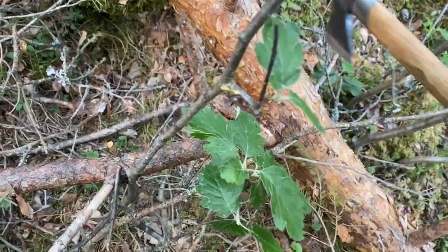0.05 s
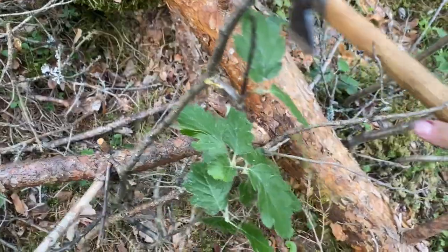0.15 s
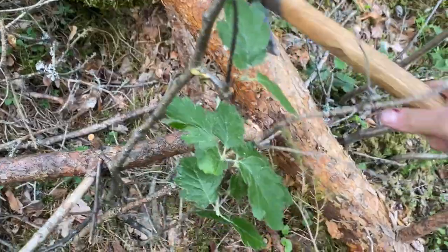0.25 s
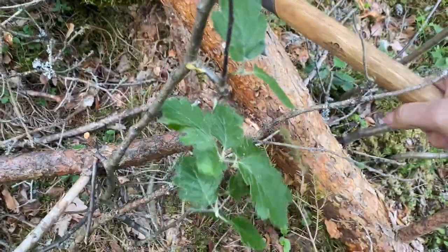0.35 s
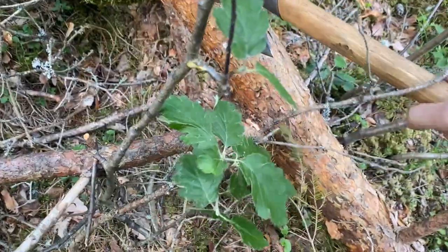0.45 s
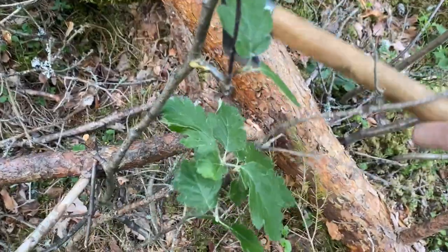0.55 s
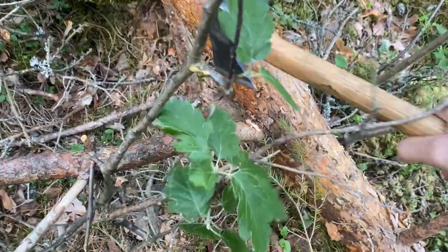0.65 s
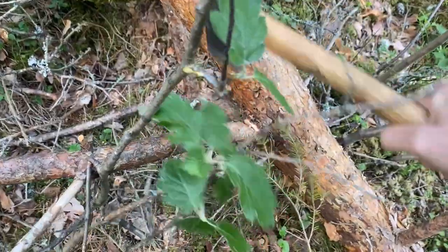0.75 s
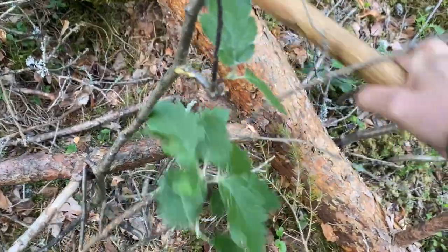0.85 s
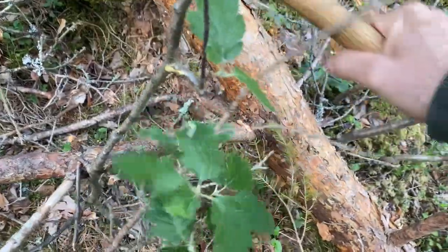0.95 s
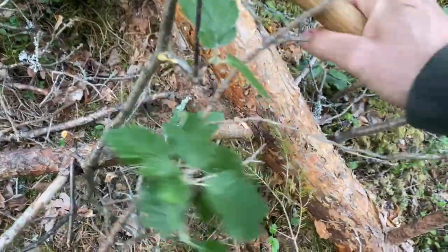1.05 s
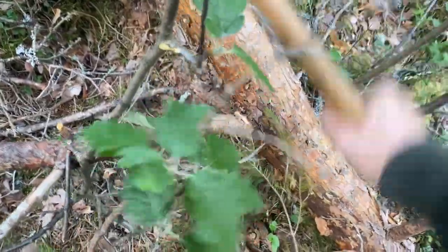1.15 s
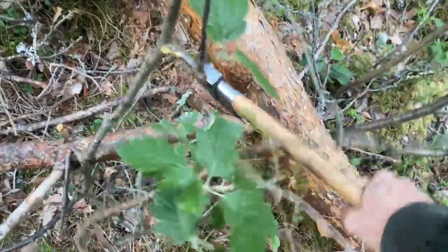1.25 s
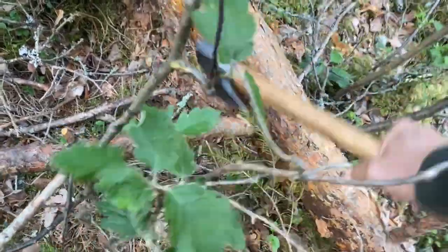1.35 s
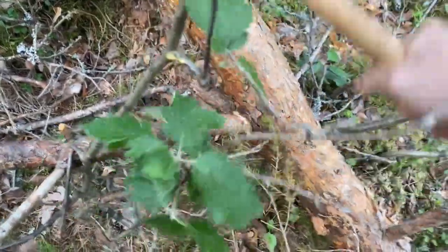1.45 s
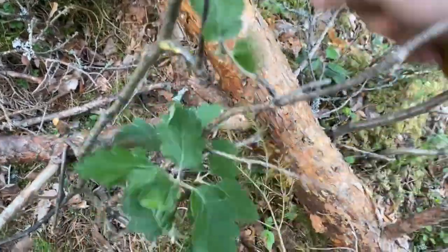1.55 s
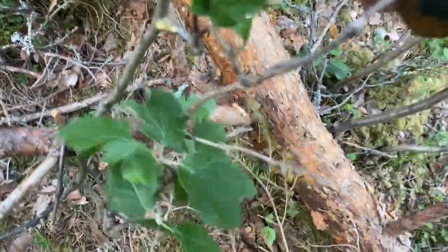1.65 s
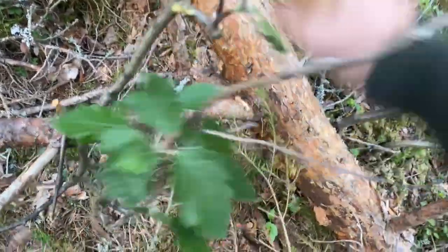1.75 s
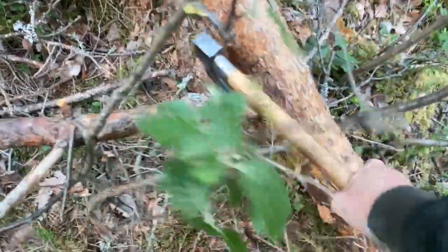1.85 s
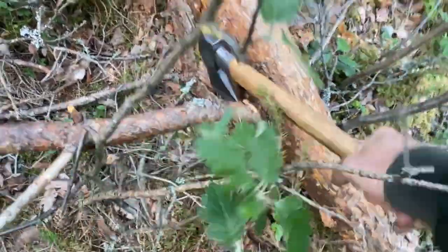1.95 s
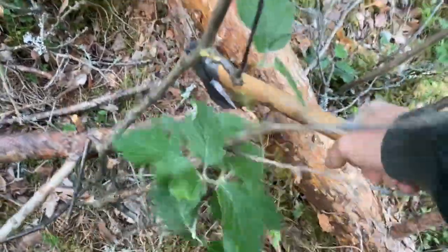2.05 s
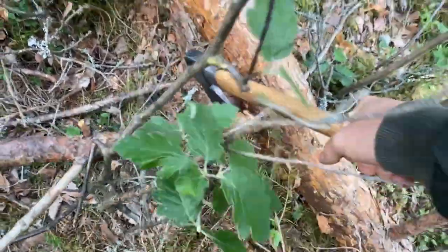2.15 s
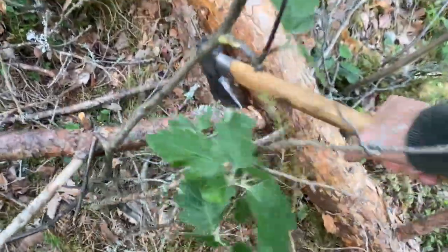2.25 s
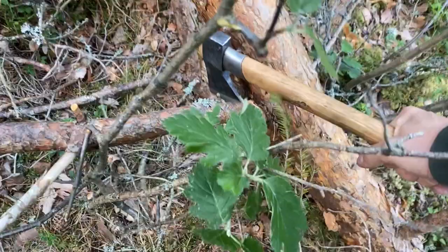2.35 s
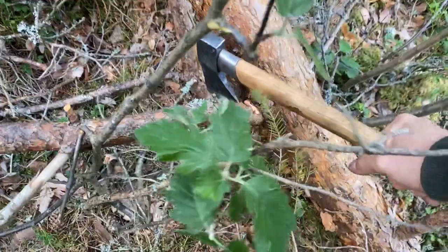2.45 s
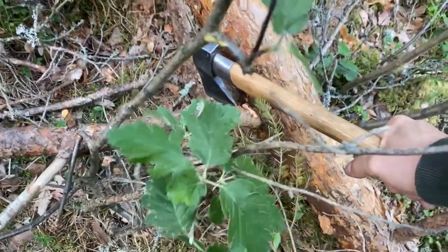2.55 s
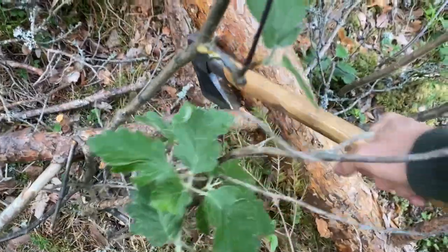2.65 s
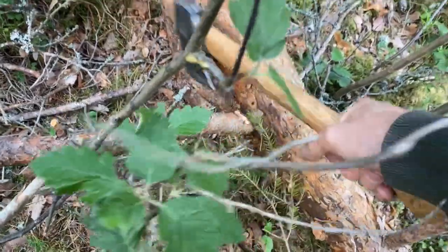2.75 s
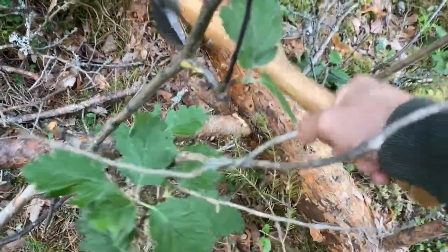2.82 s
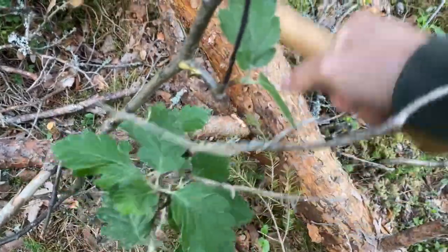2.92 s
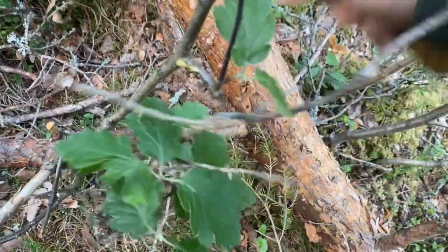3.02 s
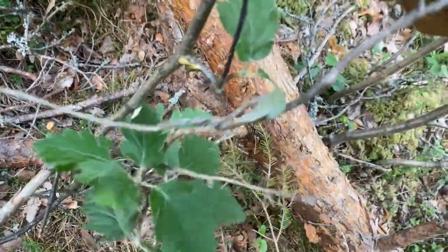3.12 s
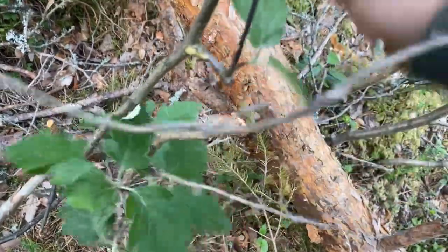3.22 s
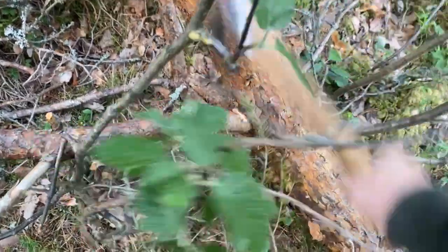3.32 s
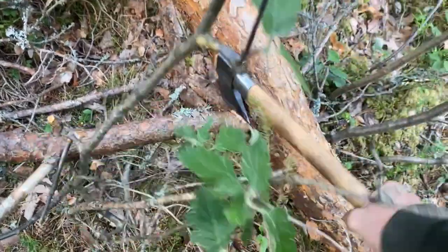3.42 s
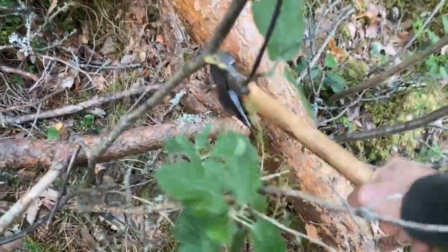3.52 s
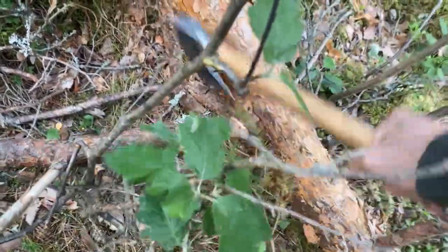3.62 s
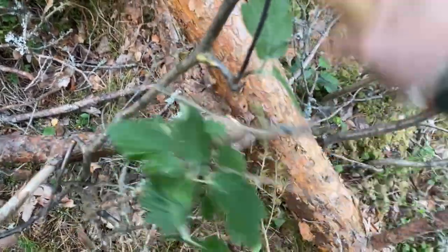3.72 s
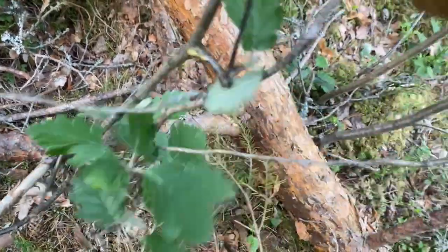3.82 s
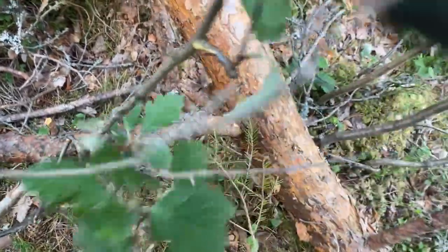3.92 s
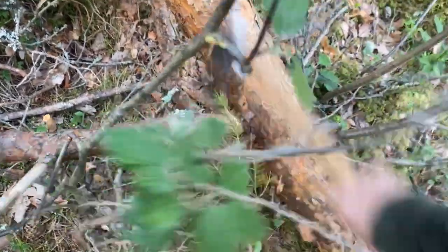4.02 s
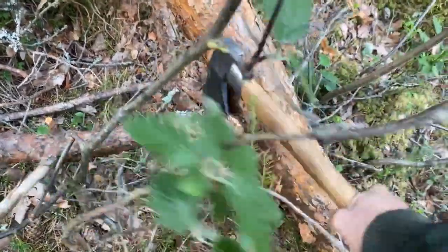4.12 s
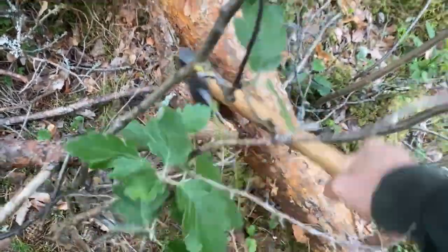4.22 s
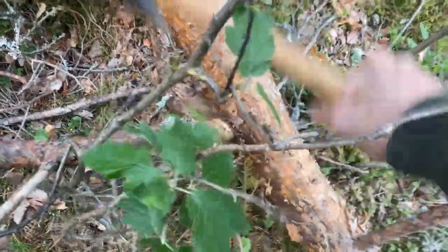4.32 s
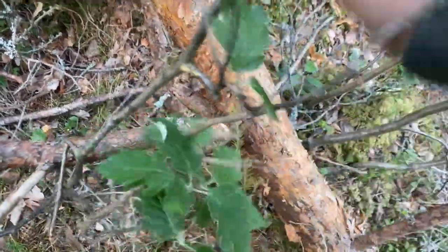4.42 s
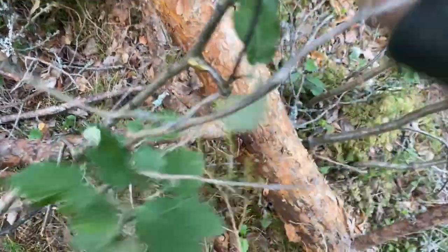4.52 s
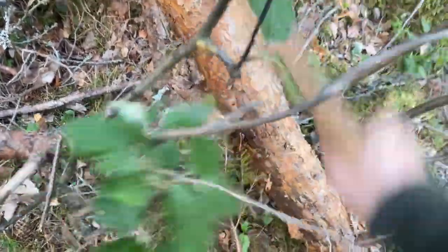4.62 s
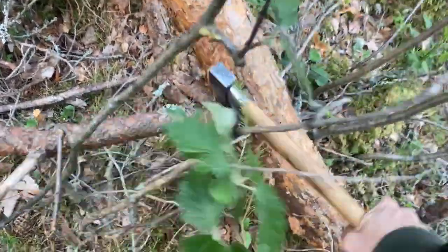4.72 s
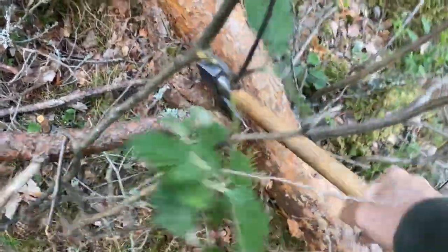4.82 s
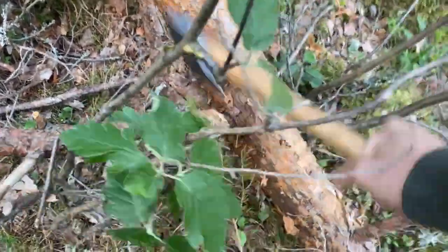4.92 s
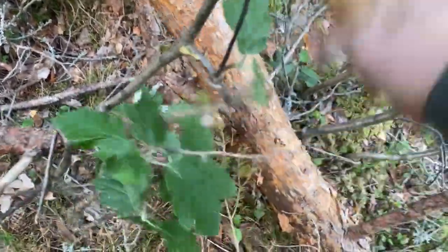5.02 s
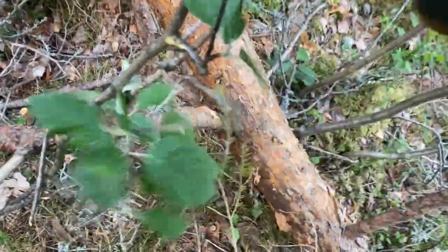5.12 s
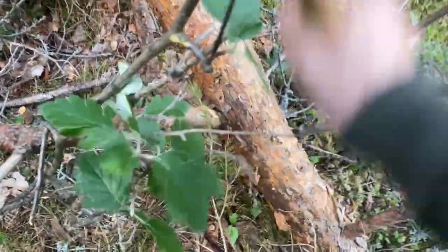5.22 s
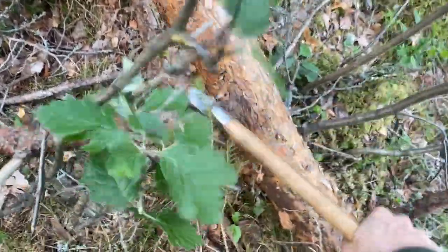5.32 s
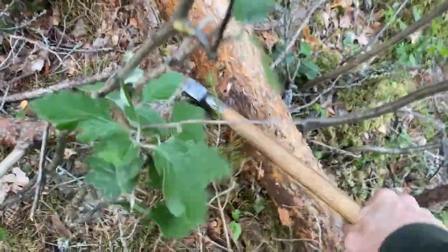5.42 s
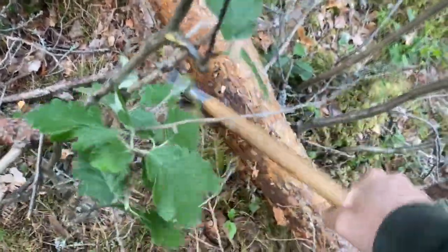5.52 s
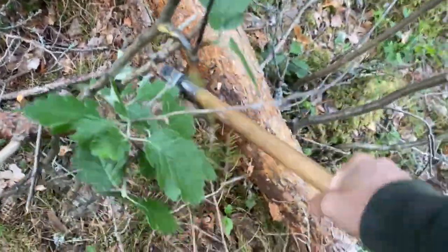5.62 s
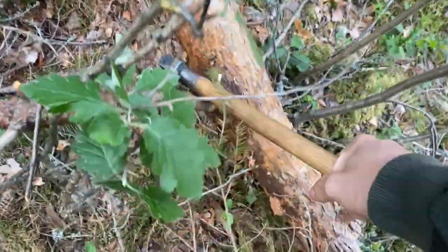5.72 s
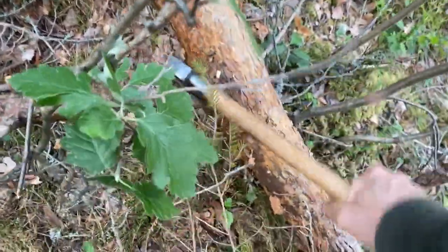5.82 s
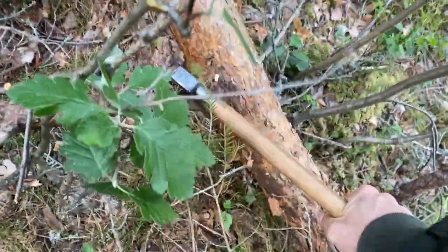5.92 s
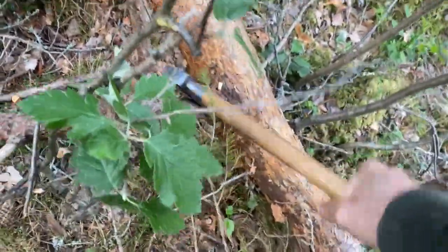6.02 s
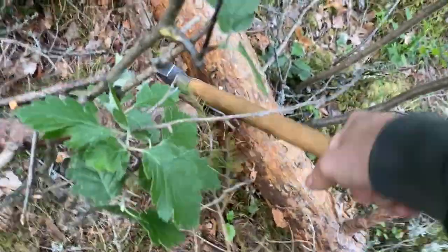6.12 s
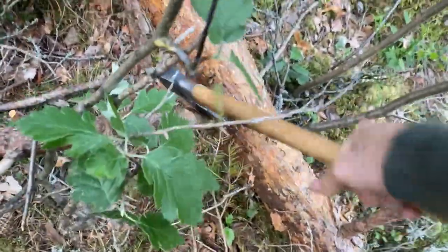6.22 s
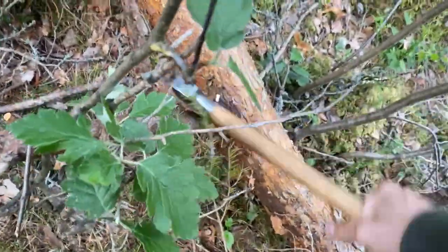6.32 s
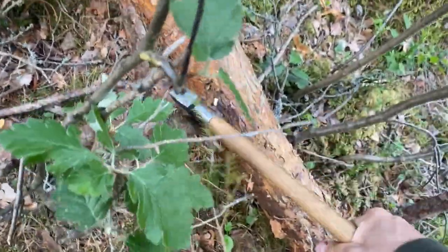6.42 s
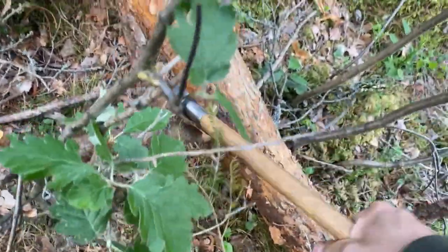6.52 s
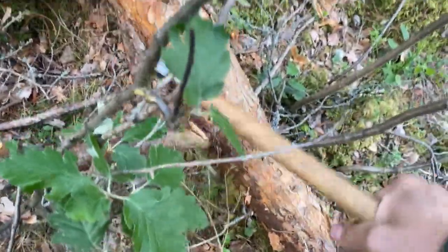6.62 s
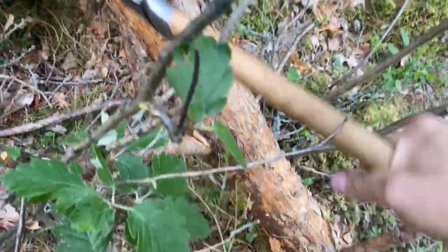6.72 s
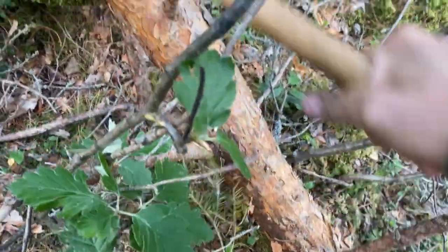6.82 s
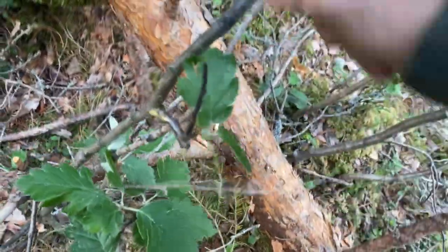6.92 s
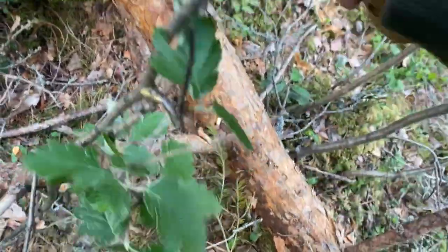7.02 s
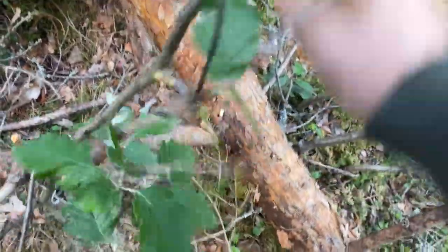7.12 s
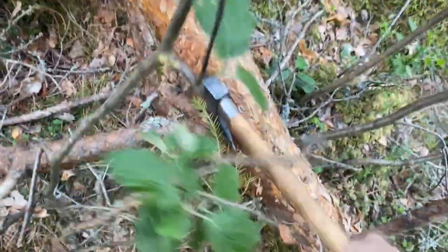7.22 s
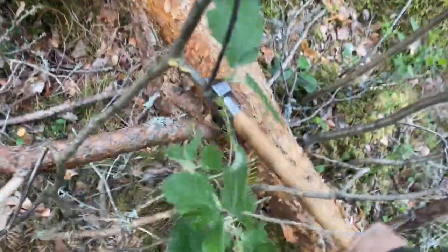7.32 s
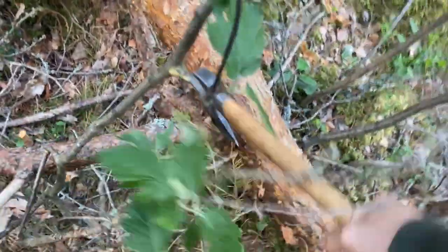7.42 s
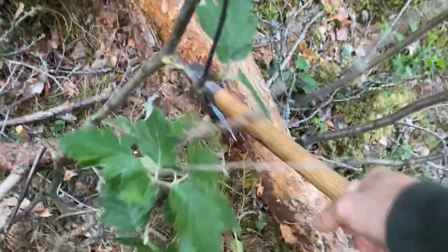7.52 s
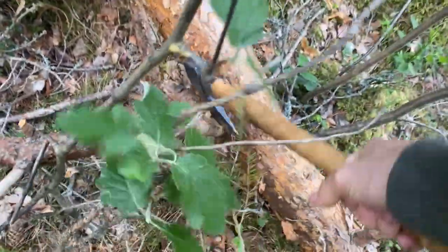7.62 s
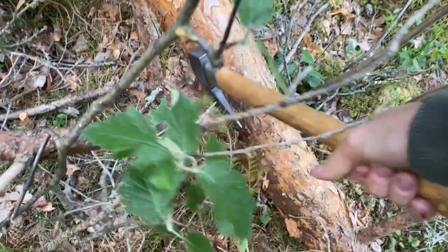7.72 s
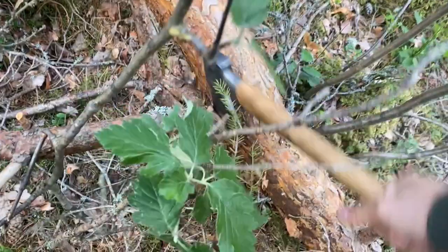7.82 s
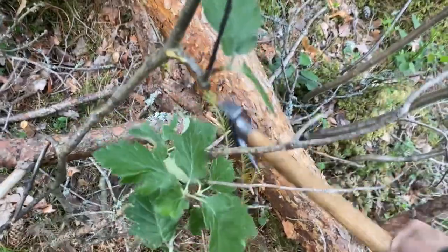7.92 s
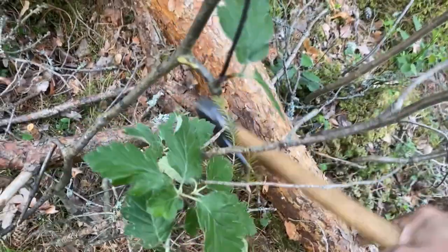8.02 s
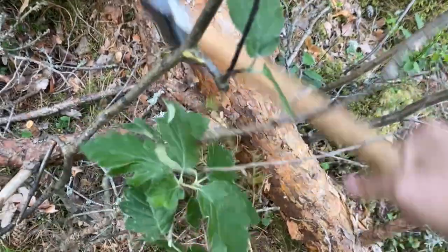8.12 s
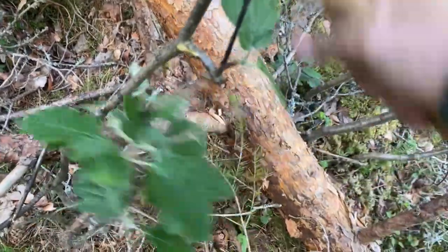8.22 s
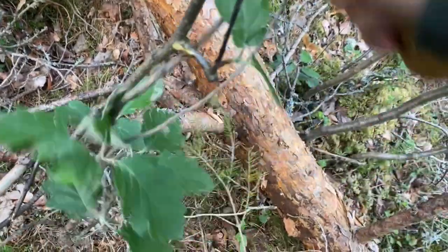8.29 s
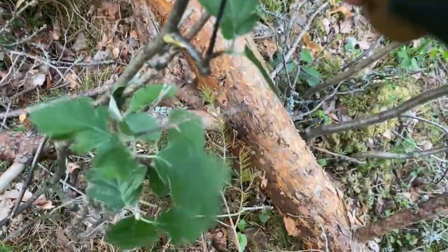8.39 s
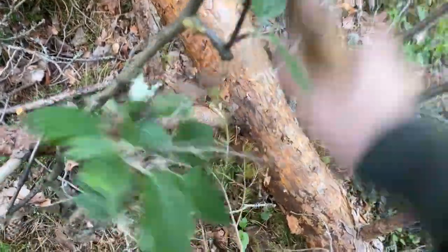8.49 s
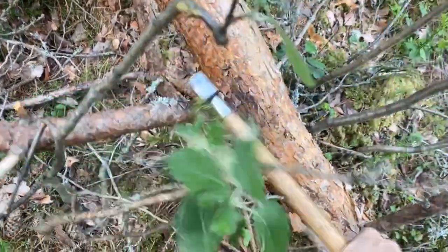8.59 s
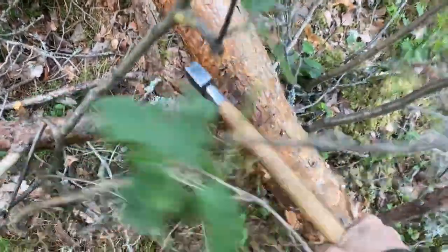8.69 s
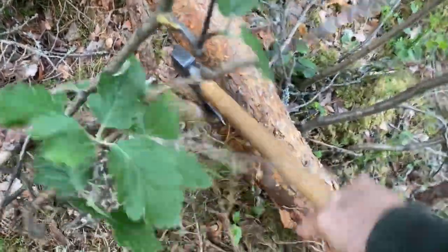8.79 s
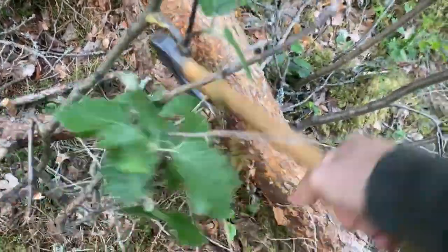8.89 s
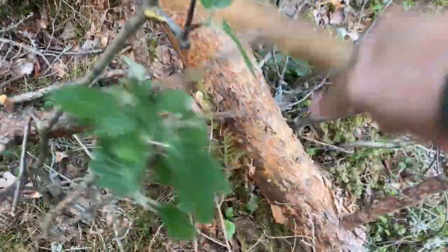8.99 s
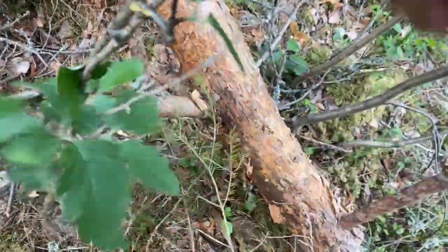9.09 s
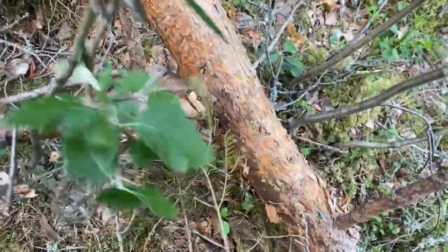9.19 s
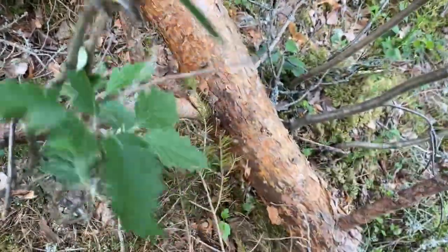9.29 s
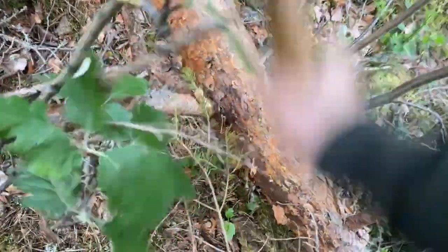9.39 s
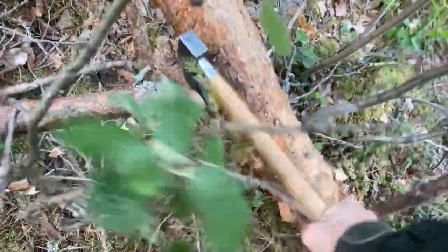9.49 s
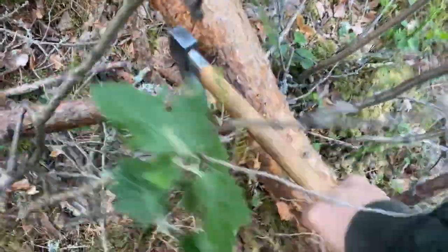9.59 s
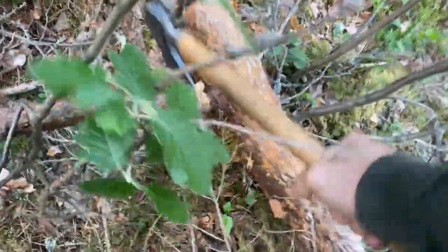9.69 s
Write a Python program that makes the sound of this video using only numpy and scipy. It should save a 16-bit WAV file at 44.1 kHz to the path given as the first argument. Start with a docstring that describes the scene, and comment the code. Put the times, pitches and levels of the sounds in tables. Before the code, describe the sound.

A small axe chops a fallen log in nine sharp, dry, woody blows, with leaves rustling and twigs snapping between them in a quiet forest.

```python
"""Axe chopping a pine log

A small axe chops into a fallen log in a forest, an arm's length away. Each blow is a blade force driving
the log's resonances, with a bright burst of breaking fibres; nearby trunks scatter the crack back.
Between blows twigs snap as runs of tiny fractures, leaves and sleeve rustle as moving noise,
and footing bumps as short low pulses, over the faint wash and low rumble of the air.
"""
import sys
import numpy as np
from scipy import signal
from scipy.fft import rfft, irfft
from scipy.io import wavfile
from scipy.ndimage import uniform_filter1d

SR = 44100
rng = np.random.default_rng(int(sys.argv[2]) if len(sys.argv) > 2 else 0)


def generate_wav(sig):
    """Save sig (samples, or channels by samples) to the path in sys.argv[1] as 16-bit PCM at SR."""
    pcm = np.round(np.clip(np.atleast_2d(sig).T, -1, 1) * 32767).astype(np.int16)
    wavfile.write(sys.argv[1], SR, pcm)


N = 429975

# Still forest air: (frequency [Hz], level [dB])
AIR_COLOUR = [(40, -1.5), (150, 5.5), (350, 4.5), (700, 4), (1200, -3.5), (2000, -9), (3200, -6.5),
              (6000, -24), (16000, -38.5)]
# Level of the low rumble of air and handling: (time [s], level [dB])
RUMBLE_LEVEL = [(0, -58), (.45, -57.5), (1, -64.5), (1.3, -53.5), (1.55, -76.5), (1.8, -57.5), (2.15, -65),
                (2.3, -53), (2.62, -73), (2.85, -52), (3.4, -50), (3.7, -58), (4.5, -53), (5.8, -52.5),
                (6.35, -62), (6.6, -59), (6.9, -58.5), (7.32, -51), (7.7, -65), (8.22, -50.5), (9.2, -60),
                (9.4, -41), (9.75, -58.5)]
# Tone of that rumble: (frequency [Hz], level [dB])
RUMBLE_TONE = [(15, -19), (35, -7.5), (62, 2), (85, -7.5), (130, -15.5), (250, -25), (800, -57)]
# Decay of the far forest tail: (frequency [Hz], t60 [s])
FOREST_DECAY = [(60, .5), (200, 0.52), (600, 0.26), (1100, 0.7), (2500, 0.49), (6000, 0.43), (14000, 0.19)]
# Tone of the far forest tail: (frequency [Hz], level [dB])
FOREST_TONE = [(60, 0), (200, -10), (600, -10.5), (900, -7.5), (1090, -6.5), (1350, -10.5), (1690, -5.5),
               (2000, -8.5), (3000, -11.5), (7000, -4), (14000, -1)]
# Loudest soft bumps of footing and handling: (time [s], frequency [Hz], envelope peak [dB])
SOFT_BUMPS = [(.3, 70, -43.5), (.385, 96, -49), (.485, 102, -42), (1.244, 150, -37), (1.285, 173, -30.5),
              (1.311, 137, -31), (1.327, 102, -35), (2.316, 104.7, -43), (2.494, 102.3, -46.5),
              (2.82, 79.7, -43), (2.929, 84, -44.5), (3.045, 80, -41.5), (3.23, 76, -45),
              (3.464, 86.5, -42), (3.54, 73.7, -42.5), (4.325, 82, -39.5), (4.87, 66, -36),
              (4.971, 65.6, -38.5), (5.701, 110, -30), (5.745, 111, -39.5), (5.846, 105, -42),
              (5.96, 82, -37), (6.128, 74.3, -46.5), (7.096, 88.4, -40), (7.335, 70.7, -42),
              (7.4, 66.4, -44), (7.868, 71, -40), (7.92, 110.9, -40), (7.97, 74.8, -45), (8.2, 59.4, -36.5),
              (8.47, 125, -37), (8.715, 70.3, -41), (8.93, 78.7, -42.5), (9.335, 87, -36),
              (9.366, 105, -29), (9.393, 74, -27)]
# Dull shuffling as weight and grip shift: (middle [s], length [s], level [dB])
SHUFFLE_SPELLS = [(0.439, 0.26, -57), (1.289, 0.13, -43.5), (1.448, .06, -53), (1.735, .05, -48),
                  (1.917, 0.13, -51.5), (2.358, 0.13, -60), (5.756, 0.092, -51), (7.933, .13, -55.5)]
# Tone of the shuffling: (frequency [Hz], level [dB])
SHUFFLE_TONE = [(30, -21), (70, 0.5), (105, 0.5), (200, -9), (330, -20), (800, -43)]
# The arm lifts or aims the axe and brushes leaves: (middle [s], length [s], level [dB], swish centre [Hz])
ARM_SWEEPS = [(0.091, 0.28, -62.5, 3145), (0.44, .24, -53.5, 3970), (0.805, 0.47, -57.5, 3160),
              (1.102, .15, -50.5, 3090), (1.333, .12, -50, 3087), (1.464, .058, -43, 5295),
              (1.591, .25, -49.5, 4080), (3.121, 0.41, -56.5, 4940), (3.823, 0.37, -51.5, 3234),
              (4.44, 0.18, -47, 3560), (4.56, 0.091, -59, 5220), (5.069, 0.14, -50, 5813),
              (5.24, 0.057, -53.5, 3040), (5.894, 0.43, -65.5, 4420), (6.331, 0.0524, -69, 3410),
              (7.091, 0.2, -53.5, 2850), (8.497, 0.36, -52.5, 2755), (9.102, 0.28, -50.5, 5040),
              (9.293, 0.3, -49, 5150), (9.727, 0.24, -53.5, 4200)]
# Tone of rubbing sleeve and leaves: (frequency [Hz], level [dB])
RUSTLE_TONE = [(100, 2), (250, 6.5), (600, 2), (1100, 3), (2000, -2.5), (3000, -2), (6000, 2.5),
               (11000, -6.5), (14000, -2), (16000, -13.5)]
# Pitch range of buckling leaves: (lowest [Hz], highest [Hz])
CRINKLE_RANGE = (1800, 7000)
# Loudest twigs and chips: (time [s], t60 [s], body [dB], crack [dB], snap [dB])
TWIG_SNAPS = [(.291, 0.024, -50, -45, -29), (0.2965, 0.028, -56, -46, -37.5),
              (0.3281, 0.019, -64, -51, -37.5), (0.6686, .02, -69.5, -63, -48.5),
              (0.8281, 0.022, -42.5, -32, -26.5), (1.318, .02, -53.5, -56, -64),
              (1.42, 0.025, -33.5, -29.5, -31.5), (1.443, .03, -44.5, -51.5, -52),
              (2.6888, 0.11, -56, -53, -40), (3.0642, 0.16, -53.5, -50.5, -43),
              (3.183, 0.035, -70.5, -64, -49), (3.2305, .015, -63, -62, -59),
              (3.295, 0.021, -56.5, -54, -54), (3.489, .03, -61, -66, -46.5),
              (4.1856, 0.014, -49.5, -42.5, -34.5), (4.192, .018, -58, -45, -41.5),
              (4.209, .025, -62, -58, -48), (4.358, 0.043, -56, -46.5, -49.5),
              (4.373, 0.081, -53, -45, -47.5), (4.397, .05, -51, -53, -47), (4.422, .02, -58, -57, -54),
              (4.4478, 0.016, -51, -32.5, -34), (4.921, .02, -66, -54, -58), (4.997, .04, -72, -53.5, -48),
              (5.052, 0.024, -70, -54, -49.5), (5.083, .02, -61, -56, -54),
              (5.1945, 0.012, -60.5, -57, -46.5), (5.226, .02, -60, -60, -58.5),
              (5.274, 0.015, -54, -43.5, -43), (5.57, 0.027, -60.5, -60, -52.5),
              (5.9, 0.021, -63.5, -61.5, -52), (6.971, 0.034, -66.5, -61.5, -45),
              (7.3327, 0.018, -47, -42, -43.5), (7.739, .012, -73, -62.5, -58),
              (7.9065, .015, -68.5, -64, -57), (8.3062, 0.025, -61.5, -48.5, -48.5),
              (8.322, .02, -64, -56, -56), (8.3769, 0.044, -71, -57, -56),
              (8.4296, .026, -57.5, -55, -48.5), (8.4583, 0.025, -61.5, -60, -44.5),
              (8.4727, 0.023, -60, -49, -43), (8.497, .03, -57.5, -49, -54), (8.5258, .025, -60, -50, -50),
              (8.8585, .025, -71.5, -58, -55.5), (9.052, .02, -60, -60, -60),
              (9.101, 0.068, -64, -49, -45.5), (9.354, .02, -62, -50, -46),
              (9.4752, 0.019, -52, -50, -40.5), (9.542, .025, -67, -58, -52), (9.601, .015, -66, -63, -50),
              (9.647, .02, -69, -60, -59), (9.675, .04, -59.5, -60, -52.5), (9.718, .018, -60, -59, -52.5)]
# Centres of the body, crack and snap bands: (frequency [Hz])
TWIG_BANDS = [1000, 4000, 11000]
# Centre levels of small flicks against the rustle: (body [dB], crack [dB], snap [dB])
FLICK_LEVELS = [-18, -14, -5.5]
# Ring of the steel head: (frequency [Hz], t60 [s], level [dB])
HEAD_RING = [(4010, 0.033, -43), (5387, .022, -46.5)]
# Faint woody note lingering after each blow: (frequency [Hz], width [Hz], t60 [s], level against blow [dB])
WOODY_NOTE = (1055, 170.5, 1.08, -46.5)
# Neighbouring trunks: (delay after the first echo [s], level [dB])
TRUNK_ECHOES = [(0, -1.5), (.007, -9.5), (.02, -16), (0.0332, -5), (.059, -18), (.105, -26.5)]
# Tone of the scatter off the bark: (frequency [Hz], level [dB])
ECHO_TONE = [(500, -12.5), (2500, -6.5), (4000, -12.5), (5000, -5), (8500, 0), (11000, 4.5), (13000, -3.5),
             (16000, -14)]
# Tone of the splintering fibres: (frequency [Hz], level [dB])
SPLINTER_TONE = [(150, -13), (500, 2), (1000, 6.5), (1600, -3), (3000, -7.5), (5200, -3.5), (8000, -12.5),
                 (16000, -20)]
# Resonances of log and axe: (frequency [Hz], t60 [s], relative level [dB])
LOG_MODES = [(196.55, 0.044, 5.5), (248, 0.04, 4), (352, 0.026, -5), (470, 0.04, -6.5), (593, 0.05, -9),
             (1098, 0.015, -9), (1690, 0.042, -8), (2410, .04, -12), (2940, 0.012, -1), (4285, 0.0087, -8),
             (5450, .025, -9)]
# Wood around the cut, which rings anew as chips loosen; one list a blow of (frequency [Hz], level [dB])
CUT_MODES = [
    [(400, -2), (505, 11), (745, 12.5), (1140, 2.5), (2790, 11), (4130, 15)],
    [(380, 5.5), (625, 10.5), (822, 1.5), (1065, 14), (2950, 3.5), (4700, 14.5)],
    [(580, 10.5), (660, 1), (895, 6.5), (2000, 9), (3280, 11.5), (5800, 9)],
    [(236, 9.5), (511, 2.5), (890, 9.5), (1210, -1), (4650, 9.5)],
    [(436, 12.5), (630, 9.5), (760, 9), (1700, 0), (3100, 8.5), (4600, 4)],
    [(425, 14), (644, 14), (885, 10.5), (1138, 1.5), (4600, 5)],
    [(430, 12), (615, 9.5), (1080, 5), (1345, 10), (4800, 1.5)],
    [(388, 8), (530, 13), (685, 13), (1092, 4), (2980, 5.5), (5620, 7.5)],
    [(428, 11.5), (598, 11), (990, 3), (1740, 1), (2960, 8), (4810, 11)],
]
# Centres of the eight bands of a blow, push to snap: (frequency [Hz])
BLOW_BANDS = [70, 200, 450, 900, 1700, 3000, 5200, 11000]
# One row a blow: (time [s], bite time [s], stop force [x first contact], slip force before toning [relative],
# push [dB], thud [dB], knock [dB], clack [dB], rap [dB], crack [dB], splinter [dB], snap [dB],
# lag of first echo [s], echo [dB], shaken leaves [dB])
BLOWS = [(1.1971, .0045, 0.16, 2, -31, -14.5, -17.5, -18, -27, -27.5, -22.5, -23.5, .016, -29.5, -49.5),
         (1.8188, 0.0056, .25, 2, -28.5, -14, -15.5, -25, -30.5, -31, -22.5, -25.5, 0.018, -29.5, -46),
         (3.3273, .002, 0.053, 2, -22, -16, -16, -17, -30.5, -25.5, -29.5, -24, .017, -28, -59),
         (4.0112, .0098, 1.48, 2.2, -25.5, -25, -22, -19.5, -23, -21.5, -27, -23.5, .019, -35.5, -53.5),
         (4.6459, 0.0027, 0.27, 2, -25, -20.5, -18.5, -18.5, -19.5, -24, -24, -23.5, 0.015, -32.5, -52.5),
         (5.2894, 0.0067, .2, 2, -32.5, -19, -19, -17.5, -15, -27.5, -33, -33, .019, -33.5, -50),
         (7.2126, 0.0022, .45, 1.7, -24.5, -16.5, -17.5, -19.5, -19, -36.5, -23, -28, .0172, -33, -51),
         (8.5502, .005, 0.293, 1.5, -37, -26, -24.5, -21.5, -19.5, -25.5, -24, -27.5, 0.02, -33.5, -55.5),
         (9.436, 0.0044, .43, 1, -29, -28.5, -25, -23, -18, -23, -24.5, -25.5, 0.016, -43.5, -53.5)]
# Phase between the microphone ports: (frequency [Hz], lead of the left port [radians])
PORT_LEAD = [(0, 0), (550, 0.5), (900, 0.7), (2000, 0.8), (4200, 1.3255), (5800, 1.597), (9000, 3),
             (13400, 4), (16000, 8.5)]

REST_DB = -67  # leaves while the arm rests
DOWNSWING_DB_PER_S, SETTLE_DB_PER_S = 74.5, 43.5  # leaves swell as the axe falls, die as branches settle
SWAY_DB, SWAY_DB_PER_S = -61.5, 11  # the sapling sways on for longer
DRAUGHT_DB, DRAUGHT_DB_PER_S = -52.5, 72  # air pushed past the microphone: peak, and slope either side
NUDGES_PER_S, NUDGE_HZ, NUDGE_DB = 1.7, 85.56, 1.5  # fainter random bumps; dB above the rumble
CRINKLES_PER_S, CRINKLE_T60_S, CRINKLE_DB = 260, .011, -6.5  # rate over all leaves; dB against the rub
FLICKS_PER_S, FLICK_T60_S, FLICK_SPREAD_DB = 2.1, 0.017, 4.5  # smaller twigs at random
TINK_S = 2.6136  # the blade is worked loose
SIZE, LEAD = 8192, .02  # length of a short sound [samples], and its run-up before the contact [s]
T = np.arange(SIZE) / SR - LEAD  # time from the contact, for one short sound
CLOCK = np.arange(N) / SR  # time through the whole scene
EDGE_HZ = 16300  # upper band limit


def amp(db):
    """Decibels to gain."""
    return 10 ** (np.asarray(db) / 20)


def unit(x):
    """Scales to rms 1."""
    return x / np.sqrt(np.mean(x ** 2) + 1e-20)


def unit_burst(x):
    """Scales a short sound to rms 1 with its energy counted over 20 ms."""
    return unit(x) * np.sqrt(.02 * SR / SIZE)


def read(points, hz):
    """Reads a table along a log-frequency axis."""
    f, value = np.transpose(points)
    return np.interp(np.log(hz + 1), np.log(f + 1), value)


def bins(x):
    """Frequencies of the spectrum of x."""
    return np.fft.rfftfreq(x.shape[-1], 1 / SR)


def colour(x, points):
    """Filters x by a (Hz, dB) spectrum."""
    return irfft(rfft(x) * amp(read(points, bins(x))), x.shape[-1])


def add(mix, s, sound):
    """Mixes a sound in at time s."""
    part = mix[max(round(s * SR), 0):][:len(sound)]
    part += sound[:len(part)]


def voiced(x, centres_hz, levels_db):
    """Gives each overlapping band of a short sound its level, counted over 20 ms."""
    spectrum, pitch = rfft(x), np.log(bins(x) + 1)
    bands = np.array([np.interp(pitch, np.log(centres_hz), w) for w in np.eye(len(centres_hz))])
    power = 2 * bands ** 2 @ abs(spectrum) ** 2 / len(x) / (.02 * SR)
    gains = amp(levels_db) / np.sqrt(power + 1e-20)
    return irfft(spectrum * (gains @ bands))


def crackle(count, per_s, spread_db):
    """A train of tiny fractures of very unequal size, over count samples."""
    size = amp(spread_db * np.minimum(rng.exponential(1, count), 4))
    return unit(size * rng.standard_normal(count) * (rng.random(count) < per_s / SR))


def wander(hz):
    """Slow chance of rms 1, up to about hz."""
    knots = rng.standard_normal(2000)
    return unit(np.interp(CLOCK * 2 * hz, np.arange(len(knots)), knots))


def dying(t60, hold=0):
    """An envelope that starts at the contact, holds, and dies."""
    return (T >= 0) * amp(-60 * np.maximum(T - hold, 0) / max(t60, 1e-4))


def swell(s, db, rise_db_per_s, fall_db_per_s):
    """Power that climbs to a peak at time s and falls away."""
    rise = rise_db_per_s * np.maximum(s - CLOCK, 0)
    fall = fall_db_per_s * np.maximum(CLOCK - s, 0)
    return amp(db - rise - fall) ** 2


def scattered_events(per_s, count=200):
    """Loosely spaced random moments: rows (s, a normal draw for size, another for colour)."""
    place, size, tint = rng.standard_normal((count, 3)).T
    times = (np.arange(count) + .5 + .5 * place) / per_s
    return [row for row in zip(times, size, tint) if 0 < row[0] < N / SR - LEAD]


def rumble_db(s):
    """Level of the low rumble at time s."""
    return np.interp(s, *np.transpose(RUMBLE_LEVEL))


def air(still_db=-63.0, gust_db=4.5):
    """The faint wash of the forest, and lumpy low air on the microphone that swells with each swing."""
    wash = unit(colour(rng.standard_normal((2, N)), AIR_COLOUR))
    rumble = colour(rng.standard_normal(N), RUMBLE_TONE)
    lumps = unit(rumble * amp(gust_db * wander(hz=10)))
    draught = sum(swell(s, DRAUGHT_DB, DRAUGHT_DB_PER_S, DRAUGHT_DB_PER_S) for s, *_ in BLOWS)
    return amp(still_db) * wash + lumps * np.sqrt(amp(rumble_db(CLOCK)) ** 2 + draught)


def forest(x, near_db=-21, far_db=-32):
    """Ground and brush scatter the sound at once and soak it up; far trees leave a thin tail in each ear."""
    t = np.arange(4 * SIZE) / SR
    near = rng.standard_normal(len(t)) * amp(-60 * t / .11) * (t > .004)
    near = colour(near / np.linalg.norm(near),
                  [(100, 5.5), (300, 4.5), (700, 0.0), (2000, -8.5), (5000, -5.0), (12000, -2.5)])
    # the far tail dies at its own rate in each frequency band
    hz, at, z = signal.stft(rng.standard_normal((2, len(t))) * (t > .015), SR, nperseg=256)
    decay = amp(-60 * at / read(FOREST_DECAY, hz)[:, None])
    far = signal.istft(z * decay, SR, nperseg=256)[1][:, :len(t)]
    far = colour(far / np.linalg.norm(far[0]), FOREST_TONE)
    return signal.fftconvolve(x[None], amp(near_db) * near + amp(far_db) * far, axes=1)[:, :N]


def bumps(cycles=0.66, spread_db=1.0, spread_octaves=0.35):
    """Dull pushes of foot and hand that swell and die within a few cycles."""
    out = np.zeros(N)
    nudges = [(s, NUDGE_HZ * 2 ** (spread_octaves * tint), rumble_db(s) + NUDGE_DB + spread_db * size)
              for s, size, tint in scattered_events(NUDGES_PER_S)]
    for s, hz, db in SOFT_BUMPS + nudges:
        turns = np.maximum(T, 0) * hz
        envelope = turns / cycles * np.exp(1 - turns / cycles)
        add(out, s - LEAD, amp(db) * envelope * np.sin(2 * np.pi * turns))
    return out


def shuffles():
    """A low, unbroken flutter for each shift of weight or grip."""
    level = sum(amp(db) / (1 + (2 * (CLOCK - s) / length) ** 6) for s, length, db in SHUFFLE_SPELLS)
    return unit(colour(rng.standard_normal(N), SHUFFLE_TONE)) * level


def motion():
    """How hard sleeve and leaves rub: a hump for each arm sweep, a swell and a settling for each blow."""
    power = amp(REST_DB) ** 2
    for s, length, db, _ in ARM_SWEEPS:
        power = power + amp(db) ** 2 / (1 + (2 * (CLOCK - s) / length) ** 2) ** 2
    for s, *_, leaves_db in BLOWS:
        power += swell(s, leaves_db, DOWNSWING_DB_PER_S, SETTLE_DB_PER_S)
        power += swell(s, SWAY_DB, DOWNSWING_DB_PER_S, SWAY_DB_PER_S)
    return np.sqrt(power)


def patches(shape, bands, frames):
    """Smooth random patches of rms 1 across a spectrogram."""
    across = uniform_filter1d(rng.standard_normal(shape), size=bands, axis=0)
    return unit(uniform_filter1d(across, size=frames, axis=1))


def patchy(x, patch_db=2.5, fold_db=1.5, swish_db=2.0, swish_octaves=.22, drift_octaves=.12):
    """Different leaves and folds rub in turn, in small and broad patches; sweeps steer a drifting swish."""
    hz, at, z = signal.stft(x, SR, nperseg=512)
    leaves = patches(z.shape, bands=7, frames=9)
    folds = patches(z.shape, bands=25, frames=14)
    middles, _, _, swish_hz = np.transpose(ARM_SWEEPS)
    drift = drift_octaves * np.interp(at, CLOCK, wander(hz=9.5))
    centre = np.log2(np.interp(at, middles, swish_hz)) + drift
    swish = np.exp(-.5 * ((np.log2(hz + 1)[:, None] - centre) / swish_octaves) ** 2)
    gain = amp(patch_db * leaves + fold_db * folds + swish_db * swish)
    return signal.istft(z * gain, nperseg=512)[1][:N]


def crinkles(count=20, spread_db=3.0, octaves=.33):
    """Single leaves and folds buckle in separate dry crackles, each leaf with its own pitch."""
    t = np.arange(1024) / SR
    out = np.zeros(N)
    for hz in np.geomspace(*CRINKLE_RANGE, count):
        leaf = rng.standard_normal(len(t)) * amp(-60 * t / CRINKLE_T60_S)
        band = np.exp(-.5 * (np.log2((bins(t) + 1) / hz) / octaves) ** 2)
        leaf = irfft(rfft(np.roll(leaf, len(t) // 8)) * band)
        out += unit(signal.oaconvolve(crackle(N, CRINKLES_PER_S / count, spread_db), leaf)[:N])
    return unit(out)


def rustle(moving, flutter_db=1.12, grain_db=-3, clump_db=4, apart=0.43):
    """Sleeve and leaves rub in a soft hiss with clumps of dry ticks; it dies away when the arm rests."""
    ticks = crackle(N, per_s=770, spread_db=4.0) * amp(clump_db * wander(hz=22.45))
    rasp = rng.standard_normal(200) * np.exp(-np.arange(200) / 30)
    ticks = signal.oaconvolve(ticks, rasp)[:N]
    rub = patchy(colour(rng.standard_normal(N) + amp(grain_db) * unit(ticks), RUSTLE_TONE))
    # a part that is independent left and right
    scattered = colour(rng.standard_normal((2, N)),
                       [(100, -0.5), (1000, 7), (1800, 0.5), (3000, 10.5), (5000, -2.5), (9000, -23.0),
                        (16000, -27.5)])
    leaves = unit(unit(rub) + amp(CRINKLE_DB) * crinkles() + apart * unit(scattered))
    return leaves * moving * amp(flutter_db * wander(hz=16))


def twig(t60, levels_db, break_gain=1.0, lead_in=0.12, lead_in_t60=0.079):
    """Faint noise swells briefly, then a snap and a quick run of smaller fractures."""
    before = lead_in * (T < 0) * amp(-60 * abs(T) / lead_in_t60)
    shape = dying(t60) + break_gain * dying(0.0041) + 0.079 * dying(0.12) + before
    burst = crackle(SIZE, per_s=21000, spread_db=3.5) * shape
    burst = colour(burst, [(60, -21.0), (250, -4.5), (600, -0.5), (11000, 2.0), (14000, -2.0), (16000, -6.0)])
    return voiced(burst, TWIG_BANDS, levels_db)


def twigs(moving, count=12):
    """The loud snaps, and small flicks that are as strong as the leaves are moving."""
    out = np.zeros(N)
    for s, t60, *levels_db in TWIG_SNAPS:
        add(out, s - LEAD, twig(t60, levels_db))
    flicks = [twig(FLICK_T60_S, FLICK_LEVELS + FLICK_SPREAD_DB * rng.standard_normal(len(FLICK_LEVELS)))
              for _ in range(count)]
    for k, (s, size, _) in enumerate(scattered_events(FLICKS_PER_S)):
        add(out, s - LEAD, moving[int(s * SR)] * amp(FLICK_SPREAD_DB * size) * flicks[k % count])
    return out


def tink():
    """The steel head rings faintly as it comes free of the cut."""
    out = np.zeros(N)
    ringing = sum(amp(db) * dying(t60) * np.sin(2 * np.pi * hz * T) for hz, t60, db in HEAD_RING)
    add(out, TINK_S - LEAD, ringing)
    return out


def after_ring(x):
    """A narrow, fuzzy resonance that the blows set going."""
    hz, width_hz, t60, db = WOODY_NOTE
    t = np.arange(SR) / SR
    band = 1 / (1 + (2 * (bins(t) - hz) / width_hz) ** 2)
    note = irfft(rfft(rng.standard_normal(SR)) * band, SR) * amp(-60 * t / t60)
    return signal.fftconvolve(x, amp(db) * note / np.linalg.norm(note))[:N]


def echo(t60=0.0062, tail=0.099):
    """Rough bark scatters mostly the treble of the crack."""
    shape = dying(t60) + tail * dying(0.07)
    return unit_burst(colour(crackle(SIZE, per_s=34000, spread_db=3.0) * shape, ECHO_TONE))


def lead_in_noise(db=-25, rise_t60=0.034):
    """A faint rush of noise swells just before each blow."""
    rush = unit(colour(rng.standard_normal(SIZE),
                       [(60, -5), (300, -3.0), (800, -4.5), (1500, -6.5), (5000, -9.0), (8000, -33.5)]))
    return amp(db) * rush * (T < 0) * amp(-60 * abs(T) / rise_t60)


def splinters(db=-32.5, per_s=900, t60=0.11, onset_s=0.0059, grain_t60=.005, count=4):
    """Strained fibres go on giving way after the blow, in groups that each have their own short rasp."""
    settling = dying(t60) * np.clip(T / onset_s, 0, 1)
    out = np.zeros(SIZE)
    for _ in range(count):
        breaks = crackle(SIZE, per_s=per_s / count, spread_db=3.5) * settling
        rasp = rng.standard_normal(SIZE) * amp(-60 * (T + LEAD) / grain_t60)
        out += signal.fftconvolve(breaks, rasp)[:SIZE]
    return amp(db) * unit_burst(colour(out, SPLINTER_TONE))


def blade_force(bite, stop, slip, tear_t60=0.0084, stop_s=.0005):
    """The blade hits, slips through the fibres and stops with a second knock; a longer bite tears for longer."""
    force = crackle(SIZE, per_s=6000, spread_db=1.5) * dying(tear_t60, bite)
    force *= slip / np.linalg.norm(force)
    # the small slips carry little bass
    force = colour(force, [(150, -19.5), (600, -9.5), (1300, -4.5), (3000, 3.0)])
    force[round(LEAD * SR)] += 1
    force[round((LEAD + bite + stop_s) * SR)] += stop
    return force


def ring(hz, mode_hz, t60):
    """Frequency response of one mode, with gain 1 at its pitch."""
    width = np.log(1000) / (np.pi * t60)
    return 1j * hz * width / (mode_hz ** 2 - hz ** 2 + 1j * hz * width)


def log_answer(force, cut, ring_db=-1, cut_q=7, bend_s=0.005687):
    """The log rings alike every time, the cut anew; bending waves bring the crack first, the thud last."""
    hz = bins(force)
    body = 1 + amp(ring_db) * sum(amp(db) * ring(hz, f, t60) for f, t60, db in LOG_MODES)
    for f, db in cut:
        body = body * (1 + amp(db) * ring(hz, f, np.log(1000) * cut_q / (np.pi * f)))
    # bending waves travel as the root of their frequency; summing the delay gives the phase
    delay = bend_s * np.maximum(np.sqrt(LOG_MODES[0][0] / (hz + 20)) - .2, 0)
    wood = irfft(rfft(force) * body * np.exp(-2j * np.pi * np.cumsum(delay) * hz[1]))
    return colour(wood, [(15, -15.5), (50, -1.0), (120, -0.5), (3000, -1.0), (6000, -12.5), (16000, -26.0)])


def edge_burst(bite, second_snap=0.52, snap_t60=0.014):
    """The edge breaks bark and fibres in a short bright burst, and again as it stops."""
    again = second_snap * np.roll(dying(snap_t60), round(bite * SR))
    shape = dying(snap_t60, bite * 0.17) + again + 0.1 * dying(0.066, bite)
    burst = crackle(SIZE, per_s=14000, spread_db=3.0) * shape
    return colour(burst, [(200, -40.0), (1500, -9), (4500, -3.5), (7000, -2.5), (11000, -0.5),
                          (14000, -9.5), (16000, -21.5)])


def chop(bite, stop, slip, cut, levels_db):
    """One blow: the log answers the blade, the edge adds its burst, and each band takes its level."""
    wood = log_answer(blade_force(bite, stop, slip), cut)
    return voiced(unit(wood) + amp(-6.5) * unit(edge_burst(bite)), BLOW_BANDS, levels_db)


def chopping(thud_echo_db=-29):
    """All blows; each trunk returns a faint copy of the blow and a bright scatter off its bark."""
    blows, echoes = np.zeros((2, N))
    for (s, bite, stop, slip, *levels_db, lag, echo_db, _), cut in zip(BLOWS, CUT_MODES):
        blow = chop(max(bite, .001), stop, slip, cut, levels_db)
        add(blows, s - LEAD, blow + lead_in_noise() + splinters())
        for delay, db in TRUNK_ECHOES:
            returned = amp(echo_db) * echo() + amp(thud_echo_db) * blow
            add(echoes, s - LEAD + lag + delay, amp(db) * returned)
    return blows, echoes


def scene():
    """Everything reaches two close microphone ports, the left one a little sooner."""
    blows, echoes = chopping()
    moving = motion()
    sharp = blows + twigs(moving) + tink()
    background = air() + bumps() + shuffles() + rustle(moving)
    mix = background + forest(sharp) + after_ring(blows) + echoes + sharp
    hz = bins(mix)
    lead = np.interp(hz, *np.transpose(PORT_LEAD))
    # left level against right
    balance_db = read([(60, -.4), (250, -.9), (600, -2.4), (1100, .5), (2000, .3), (3800, -1.3), (9000, 0)], hz)
    side = np.array([[.5], [-.5]])  # each port takes half of the difference
    return irfft(rfft(mix) * amp(side * balance_db) * np.exp(1j * side * lead), N)


def record(dry, ceiling=0.8):
    """The loudest peaks are rounded off; then the band limit."""
    held = dry / (1 + (dry / ceiling) ** 4) ** (1 / 4)
    lowpass = signal.firwin(511, EDGE_HZ, window=("kaiser", 9), fs=SR)
    return signal.oaconvolve(held, lowpass[None], "same")


dry = scene()
out = record(dry)
generate_wav(out)
```